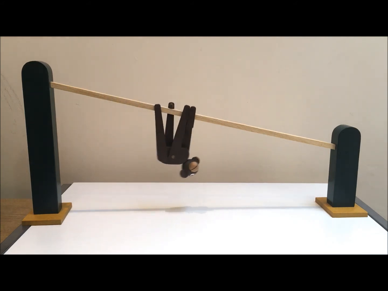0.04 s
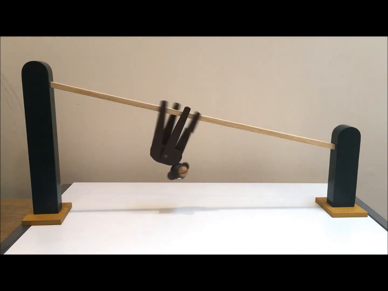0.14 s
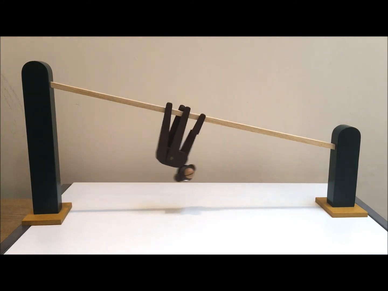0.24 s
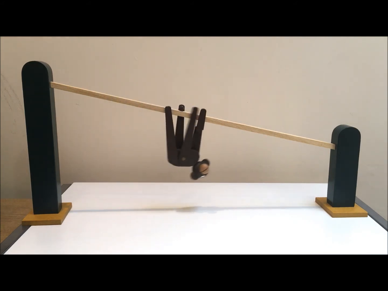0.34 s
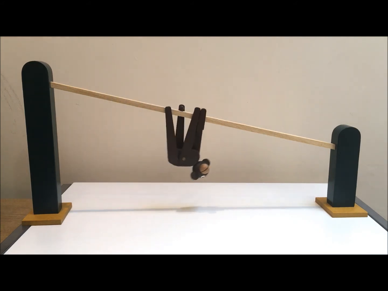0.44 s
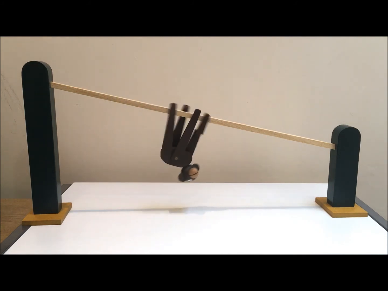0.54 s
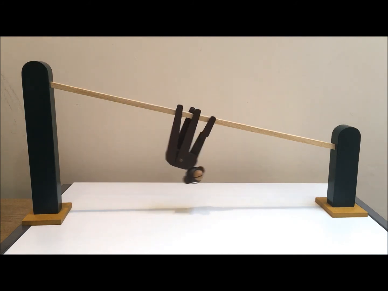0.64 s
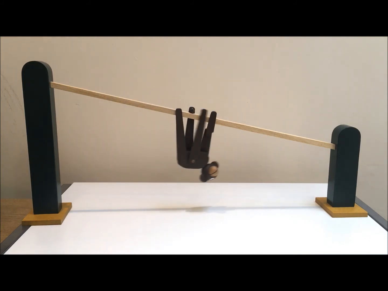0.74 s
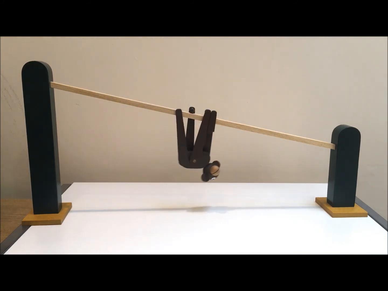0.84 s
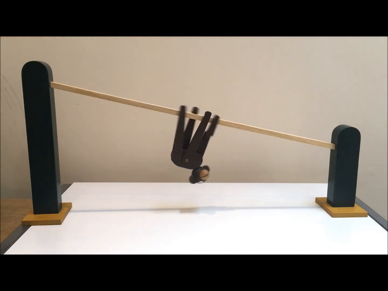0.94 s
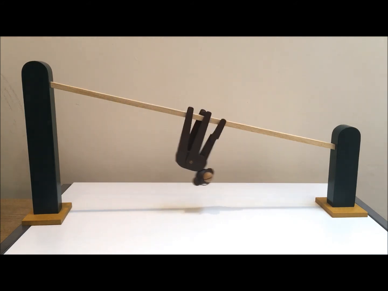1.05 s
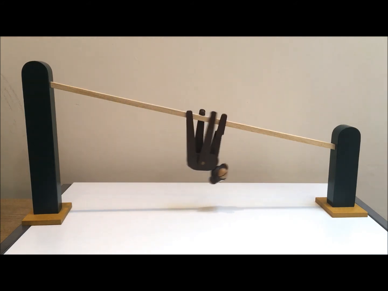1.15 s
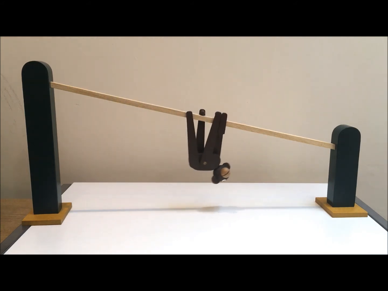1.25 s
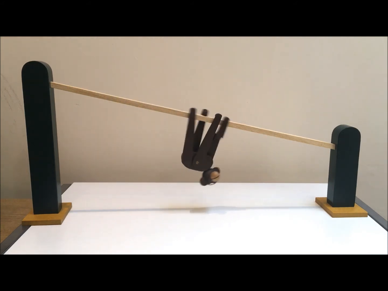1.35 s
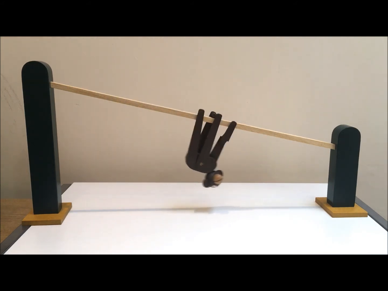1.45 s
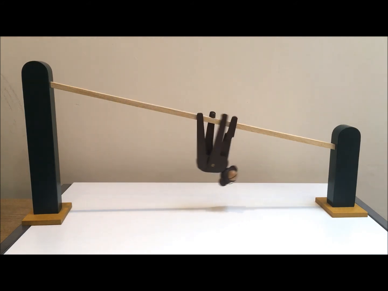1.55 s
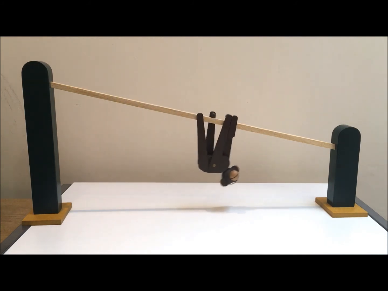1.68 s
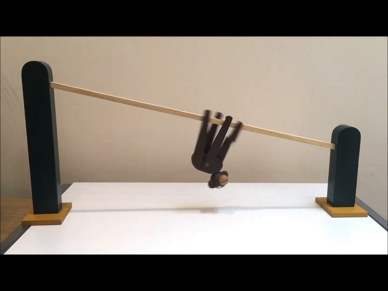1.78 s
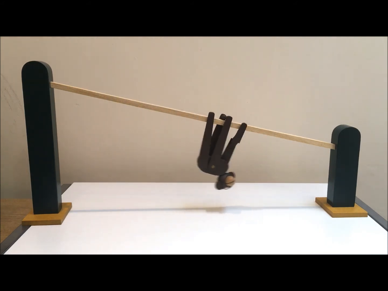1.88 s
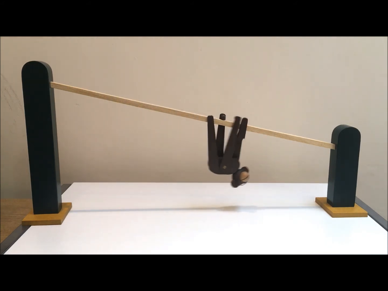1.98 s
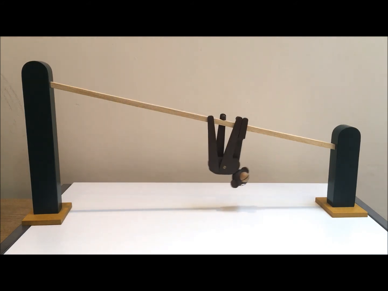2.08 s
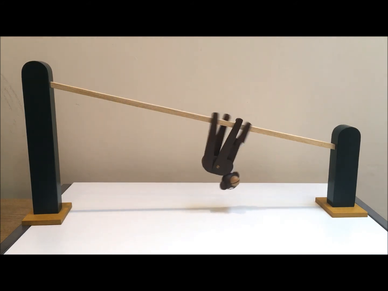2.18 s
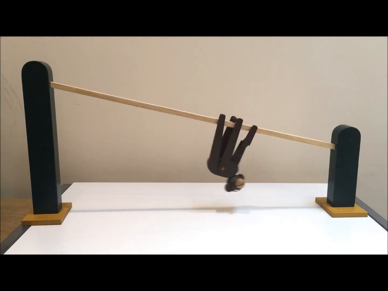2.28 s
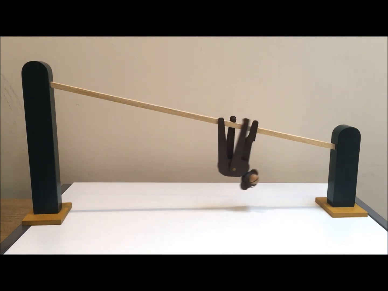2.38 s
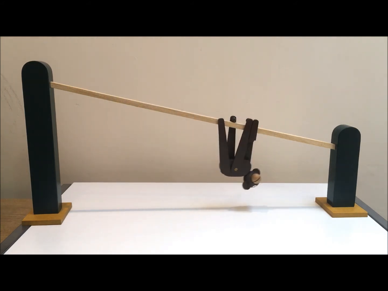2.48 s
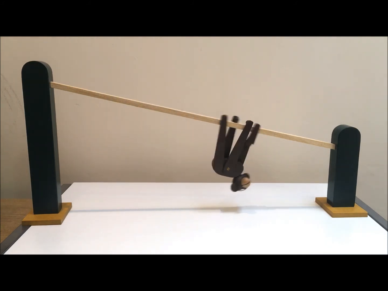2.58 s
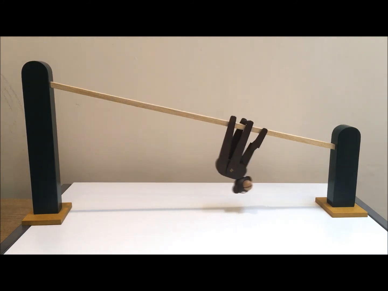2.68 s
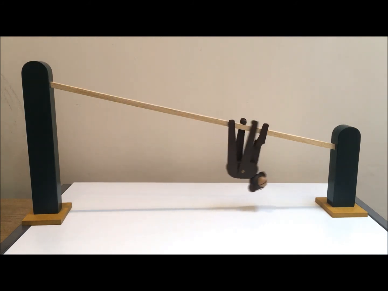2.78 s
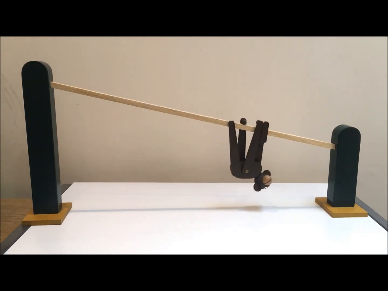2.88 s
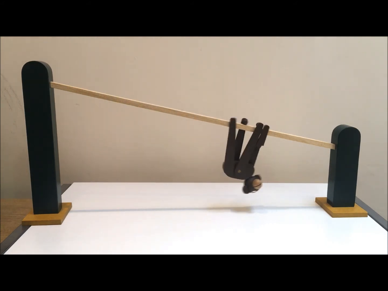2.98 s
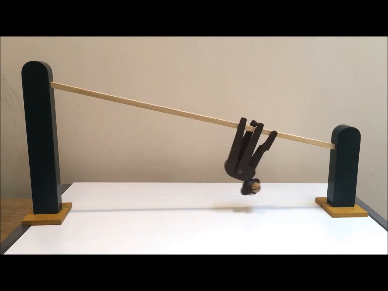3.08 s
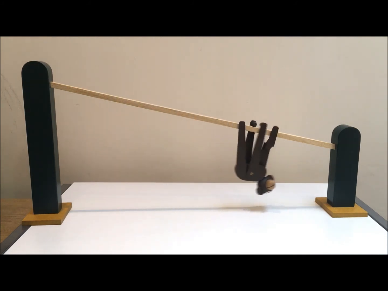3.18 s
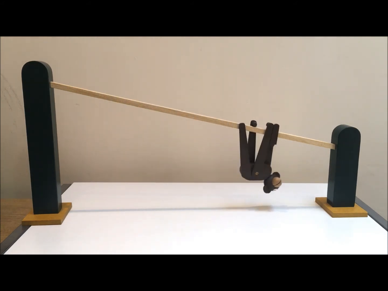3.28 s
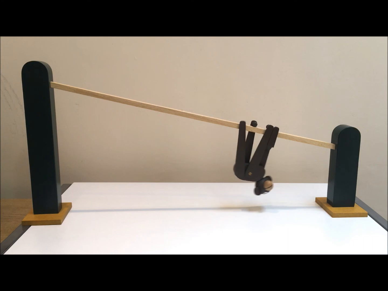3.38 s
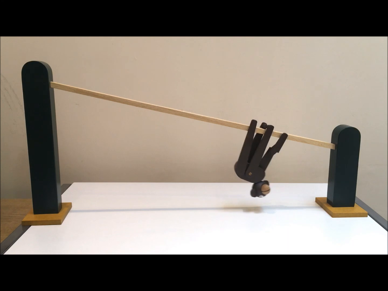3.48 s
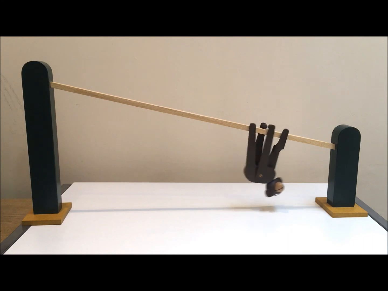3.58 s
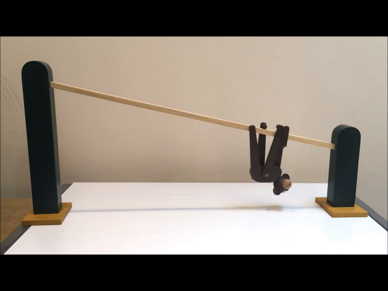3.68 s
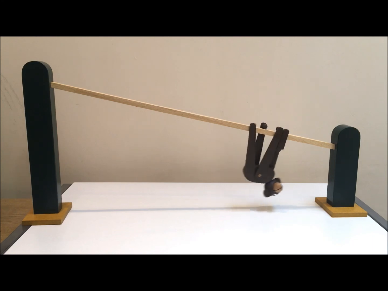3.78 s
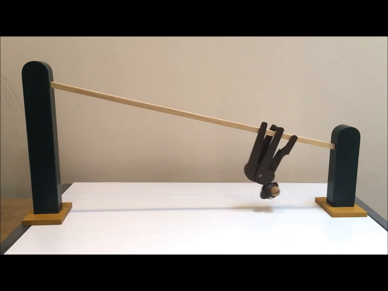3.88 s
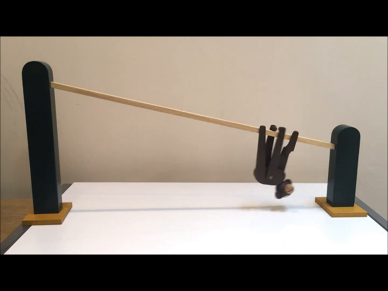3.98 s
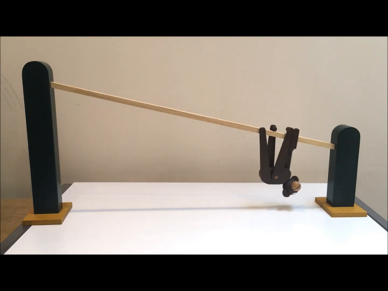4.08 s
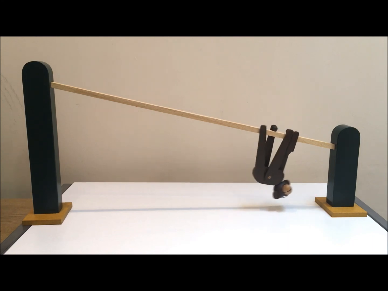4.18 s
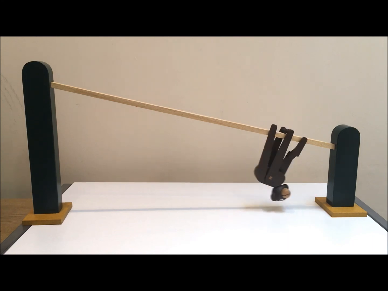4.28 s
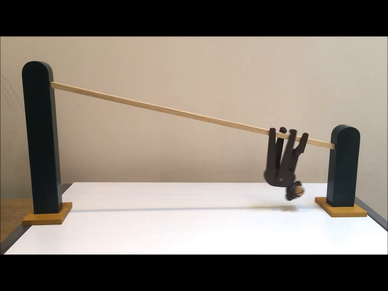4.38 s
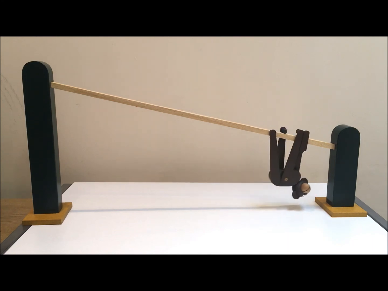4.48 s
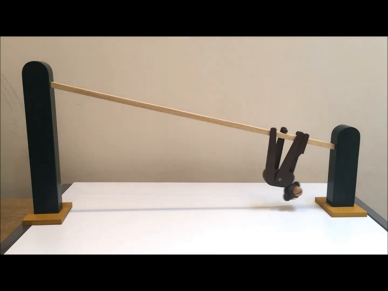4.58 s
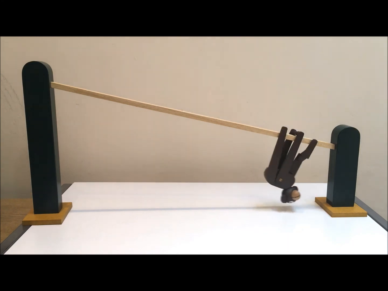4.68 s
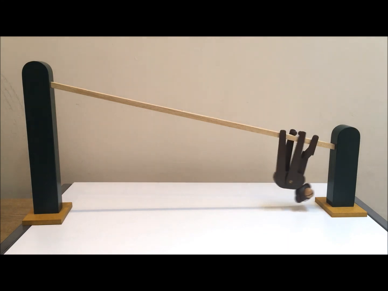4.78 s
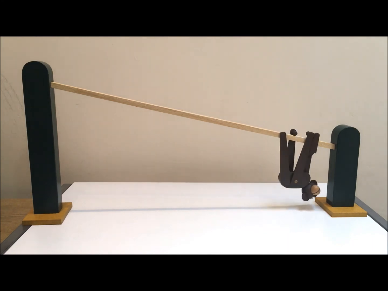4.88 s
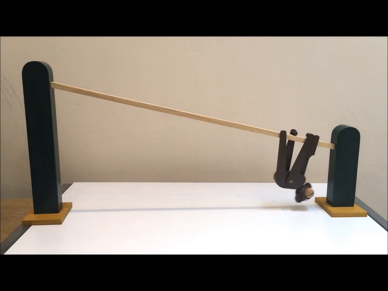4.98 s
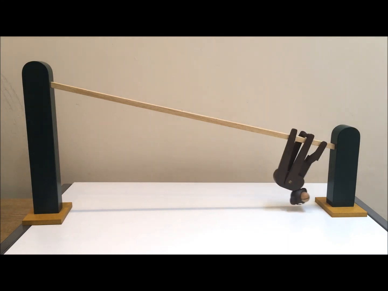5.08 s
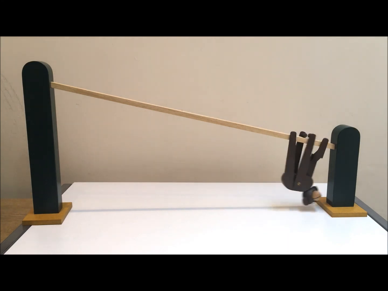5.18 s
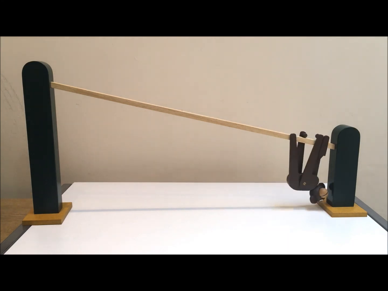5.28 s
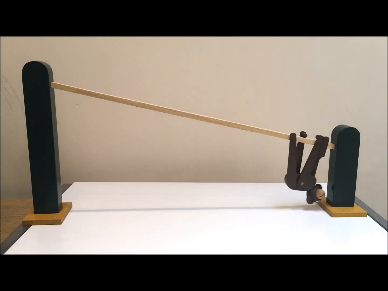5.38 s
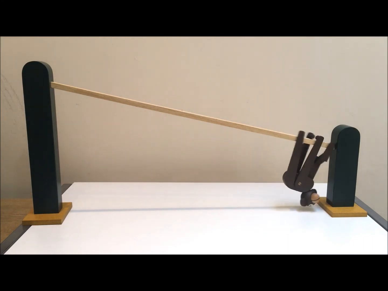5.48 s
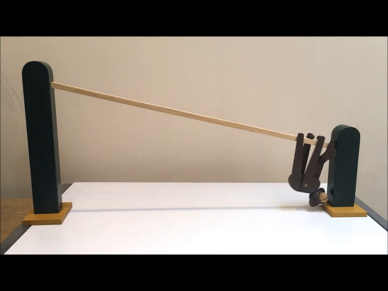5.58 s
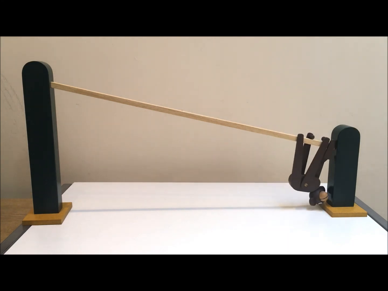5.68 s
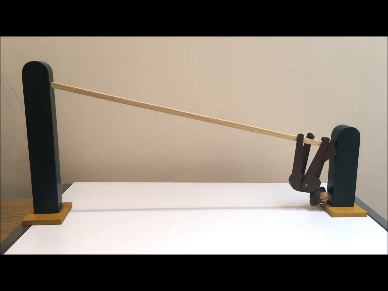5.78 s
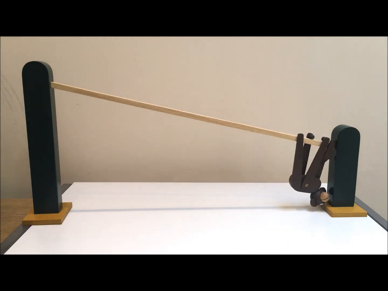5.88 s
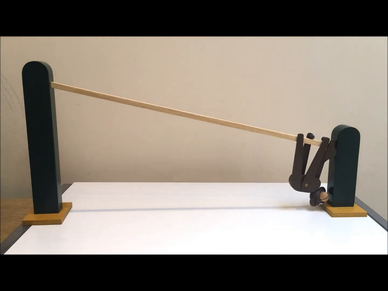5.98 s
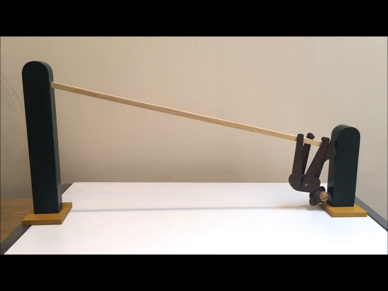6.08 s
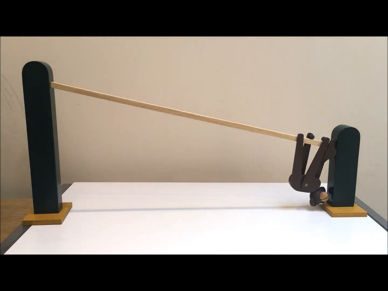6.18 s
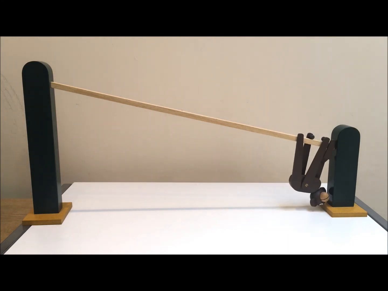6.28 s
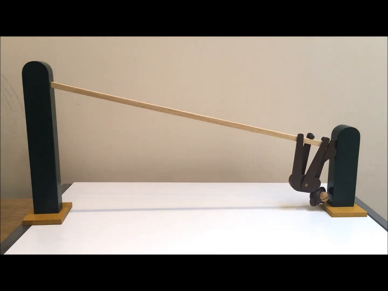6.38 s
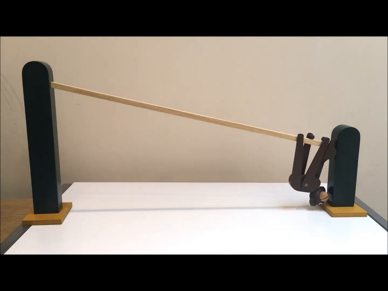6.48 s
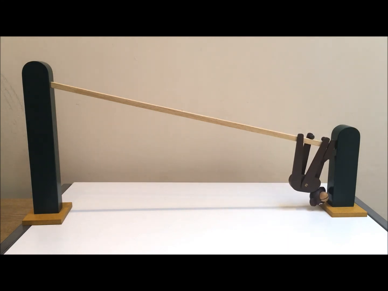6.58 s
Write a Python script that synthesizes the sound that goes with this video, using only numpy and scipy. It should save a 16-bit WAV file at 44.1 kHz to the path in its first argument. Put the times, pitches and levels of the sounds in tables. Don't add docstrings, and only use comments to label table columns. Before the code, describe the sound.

Close up in a quiet small room, a wooden toy clatters down a rod: click-clack, click-clack, bright and hard, in a regular rhythm with slight variations in strength. Soft dry slipping scrapes and little bounce ticks fill the gaps, while the rod and table answer with faint, low shivers. The last clacks weaken, a small flurry of hollow taps meets the end post, then only quiet room tone remains.

```python
import sys
import numpy as np
from scipy import signal
from scipy.fft import rfft, irfft
from scipy.io import wavfile
from scipy.ndimage import uniform_filter1d

SR = 44100
rng = np.random.default_rng(int(sys.argv[2]) if len(sys.argv) > 2 else 0)


def wrap_up_sound(samples):
    columns = np.atleast_2d(samples).T
    tamed = np.clip(columns, -1, 1)
    steps = np.round(tamed * 32767).astype(np.int16)
    wavfile.write(sys.argv[1], SR, steps)


def to_linear_factor(level_db):
    exponent = np.asarray(level_db, float) / 20
    return 10 ** exponent


N = 293265
LEAD = 2048

# f/Hz, level per Hz/dB
AIR = [(15, -33), (25, -8), (38, -18), (53, -2), (63, -14.5), (76, -18.5), (167, -19), (321, -27),
       (378, -27.5), (1470, -35.5), (3510, -37.5), (4990, -40.5), (6380, -39), (15200, -34.5), (16500, -38)]
AIR_DB = -65.5

# t/s, peak level/dB, 4-7 kHz share/dB, posts shake/dB, base shake/dB
REAR = [(-.004, -18, -8.5, -71, -64), (0.4158, -17.5, -13.5, -80, -49.5), (0.8258, -16.5, -14, -68, -51),
        (1.2325, -16, -14, -64, -53), (1.6283, -16.5, -11.5, -65, -54.5), (2.0447, -17.5, -10, -57.5, -56),
        (2.4576, -18, -10, -59, -54.5), (2.87, -18, -10, -55.5, -49), (3.285, -21, -7.5, -59, -52.5),
        (3.7096, -18, -13.5, -61, -56.5), (4.0999, -18.5, -11, -78, -47), (4.4907, -20, -7.5, -64, -46.5),
        (4.9111, -21, -9, -52, -59), (5.3099, -22, -6.5, -55.5, -53)]
# f/Hz, width/Hz, level/dB
REAR_WOOD = [(1180, 710, -39), (2000, 183, -9), (2845, 31, -20), (3073, 87, -16), (4087, 78, -12),
             (6190, 250, 0.5), (7564, 195, 0), (8984, 255, 9.5), (10780, 152, 3.5), (11900, 440, 8),
             (13630, 480, 0), (15400, 670, 15.5), (15700, 490, 9)]
# f/Hz, level/dB, time to fall 60 dB/s
REAR_RING = [(1900, -21, 0.025), (3250, -17.5, 0.035), (6214, -16.5, 0.099), (6093, -20, 0.04),
             (9870, -30.5, 0.013), (10713, -25.5, 0.028), (11260, -18, 0.0305)]
REAR_LOW_DB, REAR_TOP_DB = -23, 7
REAR_ROD_DB, REAR_ROD_DB_PER_S, REAR_TABLE_DB = -45.5, -0.95, -61
REAR_DAMPING, FRONT_DAMPING = 0.34, 0.28

# t/s, peak level/dB, 7-11 kHz share/dB, base shake/dB, table shake/dB
FRONT = [(0.2248, -15.5, -5.5, -54.5, -56.5), (0.632, -13, -11, -54.5, -56),
         (1.0379, -16, -1.5, -55.5, -63), (1.443, -14, -7.5, -54.5, -56), (1.855, -15, -7, -57.5, -51.5),
         (2.2689, -16, -4.5, -56.5, -52.5), (2.6792, -12.5, -6, -57, -52), (3.093, -13, -13, -67.5, -53.5),
         (3.5073, -13.5, -8, -57.5, -56), (3.9047, -15.5, -4, -55, -56), (4.3025, -13, -8, -54, -55),
         (4.709, -12.5, -9.5, -50, -56.5), (5.1247, -17, -4.5, -42.5, -54), (5.5402, -22, -6.5, -41, -48.5)]
# f/Hz, width/Hz, level/dB
FRONT_WOOD = [(1730, 144, -23.5), (2453, 580, -34), (4120, 930, -4), (4870, 303, 6.5), (5744, 420, -12.5),
              (6240, 144, -5.5), (6930, 210, -13), (7700, 131, -7.5), (9090, 330, 5), (11040, 230, -5.5),
              (11850, 230, -29), (14050, 190, 3.5), (15500, 290, -27)]
FRONT_BODY_DB, FRONT_MID_DB, FRONT_ROD_DB = -32, -13.5, -48.5
SOFT_DULL, FIRM_DB = 0.6, -18
POSTS_DB, POSTS_DB_PER_S, NEAR_POST_S = -62.5, 4.5, 2.16

# f/Hz, level per Hz/dB
CRACK = [(900, -28), (1600, -10.5), (3000, -17), (5000, -0.5), (8000, 0), (12000, 0.5), (16000, -5)]
SAME_SPOT = 0.85
# f/Hz, level per Hz/dB
SCATTER = [(1200, -39), (2000, -15), (3500, -15), (5000, -6), (8000, 1.5), (12000, -3), (15000, -2.5),
           (16500, -0.5)]
SCATTER_DB, SCATTER_T60_S, SCATTER_BUILD_S = -25.5, 0.11, 0.0063

# f/Hz, level/dB, time to fall 60 dB/s
STAND_PARTS = [
    [(75, -11.5, 0.66), (116.8, -1, 0.35)],
    [(156.7, 2, 0.35), (184.9, -3, 0.202)],
    [(249, 2.5, 0.11), (310.8, -1.5, 0.27)],
]
# peak after the clack/s, rise/dB per s, fall/dB per s
REAR_SWELL = [(.045, 251, 98), (0.043, 373, 264), (.045, 332, 203)]
FRONT_SWELL = [(0.04, 70, 90), (0.029, 158, 156), (0.017, 170, 137)]

# f/Hz, level/dB, time to fall 60 dB/s
ROD_NOTES = [(433, -30, 0.31), (539, -25, 0.42), (587.2, -17, 0.17), (643, -11, 0.082),
             (687.2, -13.5, 0.25), (849, -8.5, 0.026), (989, -6, 0.02), (1075, -10.5, 0.047),
             (1248, -20.5, 0.23), (1550, -10.5, 0.027), (1880, -22, 0.086), (2367, -12.5, 0.089)]
# t/s, rod shake/dB
NUDGES = [(0.0516, -73), (0.172, -74), (1.3908, -64), (1.991, -56), (2.060, -63), (2.360, -63),
          (2.500, -61), (2.6313, -63), (2.914, -53.5), (3.216, -54), (3.8502, -60), (4.2585, -56),
          (4.670, -61), (4.852, -53.5), (5.157, -59), (5.250, -53.5), (5.68, -60.5)]

# t/s, peak level/dB, 1.5-4 kHz share/dB, 4-7 kHz share/dB, 11-16 kHz share/dB
BOUNCES = [(0.0516, -21.5, -27, -10.5, -6), (0.3144, -59, -25, 6, -7), (1.5297, -51, -4, 6, 14),
           (2.500, -50, -6, 6, -4), (2.914, -46.5, 3, 7, -4), (3.329, -49, -1.5, 13, -8),
           (3.593, -50, -19, 0, -6), (4.140, -49, -1, 11, -7), (4.5373, -25, -20, -9.5, 1),
           (5.157, -46.5, 1, 17.5, -2), (5.351, -48, -5, 9, 2), (5.555, -45, -2, -2, -7),
           (5.5817, -38.5, -0.5, -2, -4), (5.599, -60, 5, -4, -9), (5.68, -54, -3.5, 5.5, 14),
           (5.739, -57, 5, -1, -10)]
# t/s, peak level/dB, 1.5-4 kHz share/dB, 4-7 kHz share/dB
CATCHES = [(0.172, -55, 4, -6), (0.204, -58, -16, 5), (0.5825, -55.5, 14.5, 9), (1.210, -59, -9, -5),
           (1.3908, -52, -2, -3), (1.8113, -51.5, 4, -1), (1.838, -53, -14, 5), (2.229, -63, 11, 3),
           (2.6303, -61, 10, -8), (3.0509, -46.5, 9, 2), (3.071, -52, 1, 3), (3.217, -63, 5.5, -1),
           (3.495, -49, -26, 0), (3.8488, -60, 12, -4), (4.2587, -61, 10, -4), (4.672, -65, 1, -6),
           (5.0722, -54, 14, -4)]
CATCH_TOP_DB = 8
# f/Hz, width/Hz, level/dB
TICK_WOOD = [(1070, 360, -14), (1570, 490, -18.5), (1700, 91, -22.5), (2505, 250, -14.5), (3200, 230, -14),
             (3910, 520, -2.5), (4840, 660, -4.5), (6250, 250, -9.5), (8340, 640, -2.5), (11290, 600, 2),
             (13160, 800, -2), (15000, 900, 0)]

# t/s, first tick/dB, scrape/dB, rod shake/dB
SLIPS = [(0.155, -60, -61.5, -53.5), (0.563, -59, -58.5, -55), (0.9693, -59.5, -67, -52.5),
         (1.3717, -57, -62, -59), (1.788, -52, -64, -49), (2.1997, -60, -58, -48.5), (2.61, -59, -60, -60),
         (3.024, -65, -59.5, -55.5), (3.4377, -51, -66.5, -50), (3.8344, -63.5, -60.5, -58),
         (4.232, -63, -59.5, -53.5), (4.637, -63, -60.5, -58.5), (5.0549, -76, -59, -75),
         (5.478, -65, -69, -55.5)]
# f/Hz, level per Hz/dB
SCRAPE_COLOUR = [(210, -46), (350, -34), (746, -1), (1240, -6.5), (1400, -11.5), (3180, -14), (3710, -18.5),
                 (5810, -16), (14000, -25.5)]

# t/s, peak level/dB
BUMPS = [
    (5.4767, -50),
    (5.5414, -33),
    (5.5554, -57),
    (5.5794, -40.5),
    (5.6014, -39),
    (5.6194, -60),
    (5.68, -50),
    (5.7389, -66),
]
# f/Hz, level/dB, time to fall 60 dB/s
POST_NOTES = [(625, -11.5, 0.034), (1080, -3, 0.035), (1280, -2.5, 0.019), (1470, 3, 0.021),
              (1587, 1, 0.019), (1900, 0, 0.015), (2390, -8, 0.021), (3130, -5, 0.01)]

# t/s, level/dB
ECHOES = [
    (.0009, -16),
    (.0016, -8),
    (.0023, -9.5),
]
# f/Hz, time to fall 60 dB/s
ROOM_T60 = [(300, 0.14), (1000, 0.1), (3000, 0.15), (6000, 0.15), (12000, 0.15), (16000, 0.11)]
# f/Hz, level/dB
ROOM_DB = [(300, -1), (1500, -4), (4000, -13.5), (8000, -12), (16000, -21.5)]
# t/s, level/dB, spread/s
FAR_WALLS = [(.007, -10.5, 0.00098), (0.02, 3, 0.0016)]


def at_hz(points, hz):
    points = np.array(points)
    return np.interp(np.log(hz), np.log(points[:, 0]), points[:, 1])


def sample(s):
    return LEAD + int(round(s * SR))


def coloured(points, size):
    hz = np.maximum(np.fft.rfftfreq(size, 1 / SR), 1)
    noise = irfft(rfft(rng.standard_normal(size)) * to_linear_factor(at_hz(points, hz)), size)
    return noise / noise.std()


def ring(force, hz, t60):
    r, w = to_linear_factor(-60 / (t60 * SR)), 2 * np.pi * hz / SR
    return signal.lfilter([0, np.sin(w)], [1, -2 * r * np.cos(w), r * r], force + 1e-18)


def fade(jolts, s):
    return signal.lfilter([1], [1, -np.exp(-1 / (s * SR))], jolts)


def highpass(x, order, hz):
    return signal.sosfilt(signal.butter(order, hz, "high", fs=SR, output="sos"), x)


def room_tone():
    return to_linear_factor(AIR_DB) * coloured(AIR, N)


def clacks(hits, wood, rings, lift_db, damping, crack_db):
    size = 8192
    out, t = np.zeros(N + LEAD + size), np.arange(size) / SR
    modes = [(hz, db, damping * 2.2 / width) for hz, width, db in wood] + list(rings)
    hz, level_db, t60 = np.transpose(modes)[:, :, None]
    t60 = np.minimum(t60, 0.035)
    phase = rng.uniform(0, 2 * np.pi, hz.shape)
    spread = [[[0.005]], [[1.2]], [[0.3]]]
    chance = rng.standard_normal((len(hits), 3, len(modes), 1)) * spread
    contact = 1 - np.exp(-(t / 0.0006) ** 2)
    bins = np.maximum(np.fft.rfftfreq(size, 1 / SR), 1)
    spot = coloured(CRACK, size)
    for (s, peak_db, low_db, mid_db, top_db), (tune, force_db, turn) in zip(hits, chance):
        shares = [(3500, low_db + 14), (4300, mid_db + 8), (6500, mid_db + 8),
                  (7500, 0), (10900, 0), (11600, top_db)]
        loudness = to_linear_factor(level_db + at_hz(shares, hz) + force_db - 60 * t / t60)
        waves = loudness * np.sin(2 * np.pi * hz * (1 + tune) * t + phase + turn)
        tilt = to_linear_factor(at_hz(shares, bins))
        splinter = np.sqrt(SAME_SPOT) * spot + np.sqrt(1 - SAME_SPOT) * coloured(CRACK, size)
        crack = irfft(rfft(splinter) * tilt) * to_linear_factor(crack_db - 60 * t / 0.003)
        wash = irfft(rfft(coloured(SCATTER, size)) * tilt) * to_linear_factor(SCATTER_DB - 60 * t / SCATTER_T60_S)
        wash *= 1 - np.exp(-t / SCATTER_BUILD_S)
        start = sample(s - 0.0007)
        out[start:start + size] += to_linear_factor(peak_db + lift_db) * contact * (waves.sum(axis=0) + crack + wash)
    return out[:N + LEAD]


def rear_clacks():
    hits = [(s, db, REAR_LOW_DB, mid_db, REAR_TOP_DB) for s, db, mid_db, *_ in REAR]
    return clacks(hits, REAR_WOOD, REAR_RING, lift_db=5.0, damping=REAR_DAMPING, crack_db=7.5)


def swell(s, db, shape):
    after_s, rise, fall = shape
    late = np.arange(-LEAD, N, 64)[:, None] / SR - s - after_s
    return (to_linear_factor(db + np.minimum(rise * late, -fall * late)) ** 2).sum(axis=1)


def stand():
    rear_s, _, _, rear_posts_db, rear_base_db = np.transpose(REAR)
    front_s, _, _, front_base_db, front_table_db = np.transpose(FRONT)
    front_posts_db = POSTS_DB + POSTS_DB_PER_S * np.maximum(front_s - NEAR_POST_S, 0)
    rear_db = [rear_posts_db, rear_base_db, REAR_TABLE_DB]
    front_db = [front_posts_db, front_base_db, front_table_db]
    out = np.zeros(N + LEAD)
    for k, modes in enumerate(STAND_PARTS):
        power = swell(rear_s, rear_db[k], REAR_SWELL[k]) + swell(front_s, front_db[k], FRONT_SWELL[k])
        hum = sum(to_linear_factor(db) * ring(rng.standard_normal(N + LEAD), hz, t60) for hz, db, t60 in modes)
        hum = highpass(hum, 2, 0.78 * modes[0][0])
        even = np.sqrt(uniform_filter1d(hum ** 2, size=4000))
        gain = np.interp(np.arange(N + LEAD) / 64, np.arange(len(power)), np.sqrt(power))
        out += gain * hum / even
    return out


def wander(per_s):
    steps = rng.standard_normal(int((N + LEAD) / SR * per_s) + 2)
    return np.interp(np.arange(N + LEAD) / SR * per_s, np.arange(len(steps)), steps)


def slipping(column):
    gain = np.zeros(N + LEAD)
    for slip, stop in zip(SLIPS, FRONT):
        start, end = sample(slip[0]), sample(stop[0])
        t = np.arange(end - start) / SR
        gain[start:end] = to_linear_factor(slip[column] - 123 * t)
    return gain


def rod():
    jolts = np.zeros(N + LEAD)
    blows = [(row[0], REAR_ROD_DB + REAR_ROD_DB_PER_S * row[0]) for row in REAR]
    blows += [(row[0], FRONT_ROD_DB) for row in FRONT]
    for s, db in blows + list(NUDGES):
        jolts[sample(s + 0.004)] = to_linear_factor(db)
    jostle = fade(jolts, 0.031) + slipping(3)
    rattle = to_linear_factor(2.5 * rng.exponential(1, N + LEAD)) * rng.choice([-1, 1], N + LEAD)
    rattle *= rng.random(N + LEAD) < 1200 / SR
    force = jostle * rattle / rattle.std() * to_linear_factor(-23.5)
    modes = sum(to_linear_factor(db) * ring(force * to_linear_factor(3.0 * wander(per_s=5)), hz, t60) for hz, db, t60 in ROD_NOTES)
    return highpass(modes, 2, 350)


def light_ticks():
    ticks = list(BOUNCES) + [(*row, CATCH_TOP_DB) for row in CATCHES]
    return clacks(ticks, TICK_WOOD, [], lift_db=1.5, damping=0.92, crack_db=-0.5)


def scrape():
    grains = to_linear_factor(4.0 * rng.exponential(1, N + LEAD)) * (rng.random(N + LEAD) < 150 / SR)
    stutter = np.sqrt(fade(grains ** 2, 0.0079) + 0.11)
    gain = slipping(2) * stutter / stutter.mean()
    ticks = np.zeros(N + LEAD)
    ticks[[sample(row[0]) for row in SLIPS]] = to_linear_factor(np.array(SLIPS)[:, 1] + 2.5)
    gain += fade(ticks, 0.002)
    return gain * coloured(SCRAPE_COLOUR, N + LEAD)


def front_clacks():
    hits = []
    for s, db, edge_db, *_ in FRONT:
        top_db = SOFT_DULL * min(db - FIRM_DB, 0) - edge_db
        hits.append((s, db + edge_db, FRONT_BODY_DB - db - edge_db, FRONT_MID_DB - edge_db, top_db))
    return clacks(hits, FRONT_WOOD, [], lift_db=10.0, damping=FRONT_DAMPING, crack_db=6.0)


def lower_post():
    at, out = [sample(s) for s, db in BUMPS], np.zeros(N + LEAD)
    chance_db = 3.0 * rng.standard_normal((len(BUMPS), len(POST_NOTES)))
    for k, (hz, level_db, t60) in enumerate(POST_NOTES):
        clicks = np.zeros(N + LEAD)
        clicks[at] = (-1) ** k * to_linear_factor(np.array(BUMPS)[:, 1] + level_db - 10.5 + chance_db[:, k])
        out += ring(clicks, hz, t60)
    return out


def room(x):
    size = 16384
    t, edges = np.arange(size) / SR, 200 * 2 ** np.arange(0, 6.6, 0.5)
    response, white = np.zeros(size), rng.standard_normal((2, size))
    for k, (low, high) in enumerate(zip(edges, edges[1:])):
        band = signal.sosfilt(signal.butter(2, [low, high], "band", fs=SR, output="sos"), white[k % 2])
        hz = np.sqrt(low * high)
        response += band * to_linear_factor(at_hz(ROOM_DB, hz) - 17 - 60 * t / at_hz(ROOM_T60, hz))
    response *= 1 - np.exp(-(t / 0.003) ** 2)
    response *= to_linear_factor(sum(db * np.exp(-((t - s) / spread) ** 2) for s, db, spread in FAR_WALLS))
    response[0] = 1
    for s, db in ECHOES:
        response[int(s * SR)] += to_linear_factor(db)
    return signal.fftconvolve(x, response)[:len(x)]


def scene():
    toy = rear_clacks() + front_clacks() + light_ticks() + scrape() + lower_post()
    heard = room(toy) + rod() + stand()
    return (heard[LEAD:] + room_tone())[None]


def low_pass(x):
    return signal.sosfilt(signal.butter(12, 17080, fs=SR, output="sos"), x)


def record(dry):
    thin = highpass(dry, 4, 36)
    cut = signal.sosfilt(signal.cheby2(12, 40, 16350, fs=SR, output="sos"), thin)
    return low_pass(cut)


dry = scene()
out = record(dry)
wrap_up_sound(out)
```